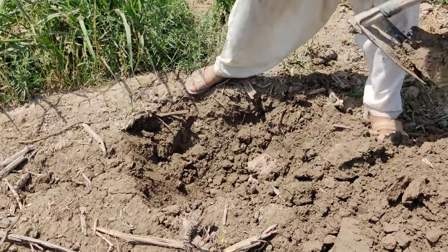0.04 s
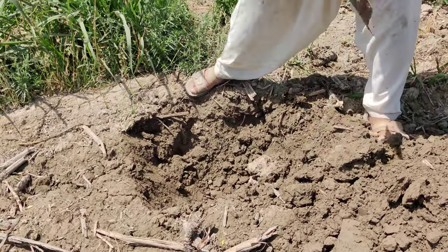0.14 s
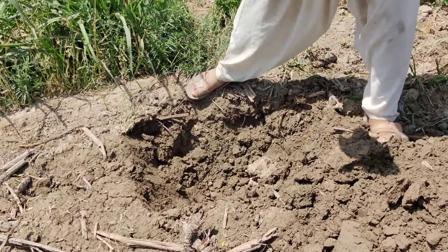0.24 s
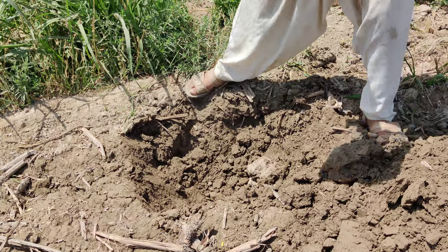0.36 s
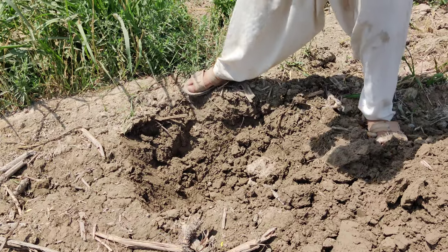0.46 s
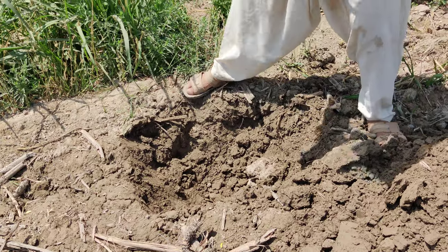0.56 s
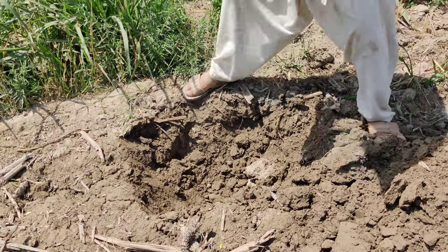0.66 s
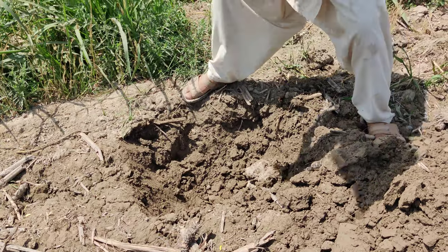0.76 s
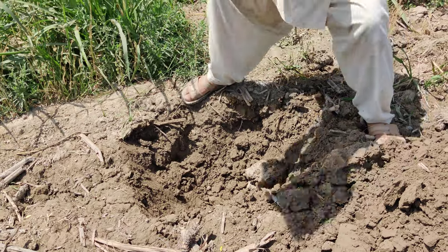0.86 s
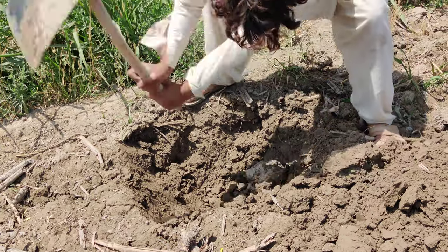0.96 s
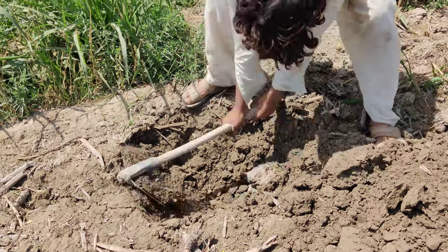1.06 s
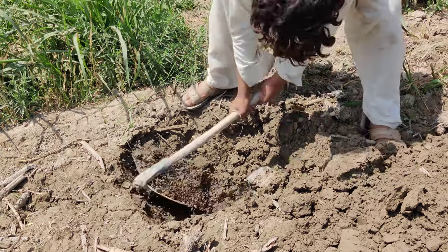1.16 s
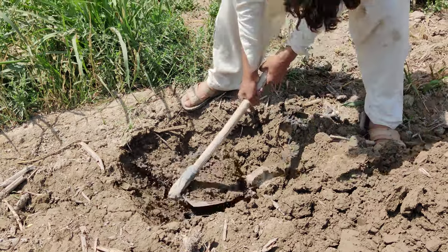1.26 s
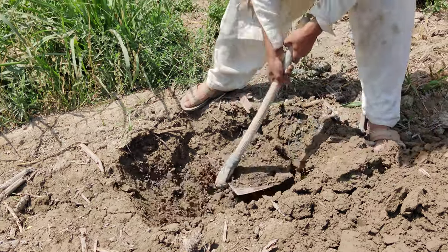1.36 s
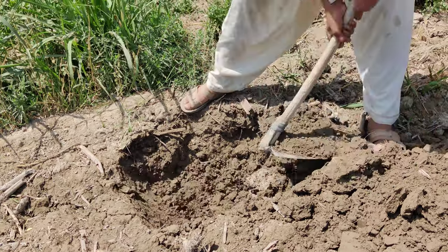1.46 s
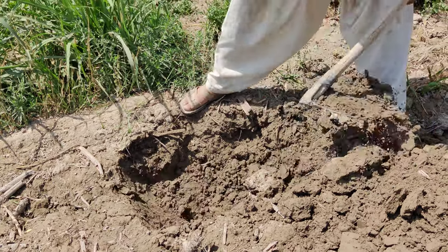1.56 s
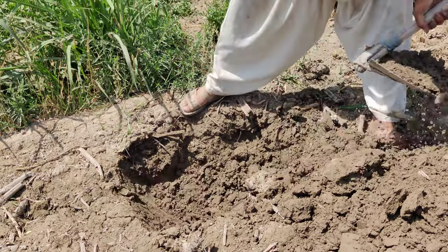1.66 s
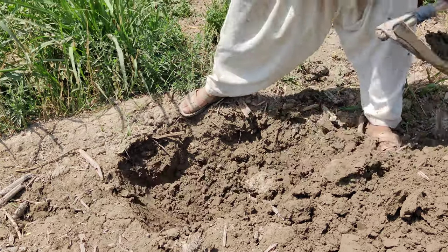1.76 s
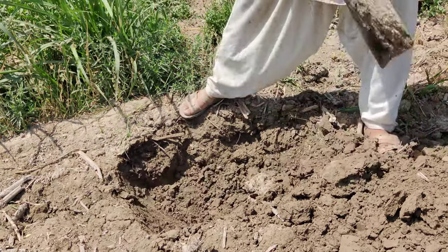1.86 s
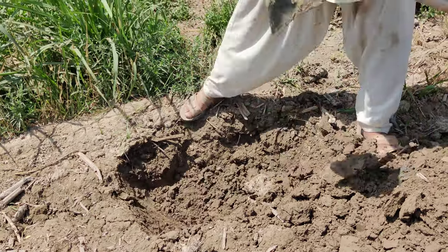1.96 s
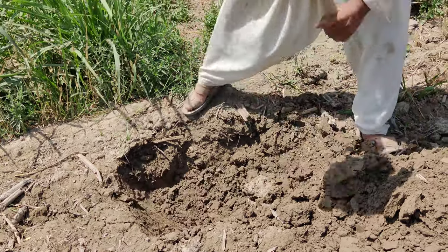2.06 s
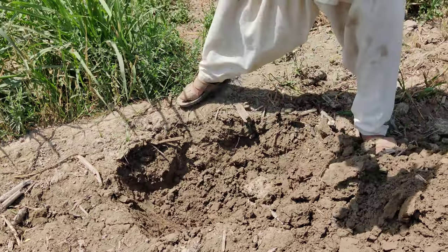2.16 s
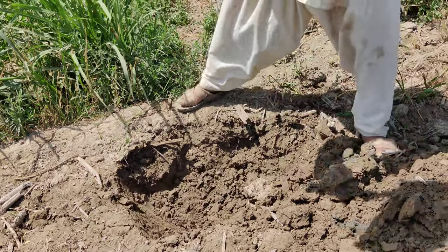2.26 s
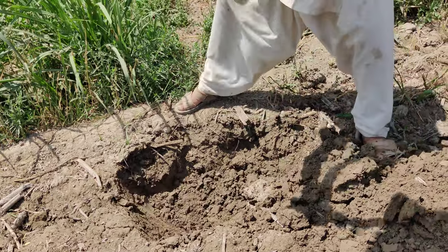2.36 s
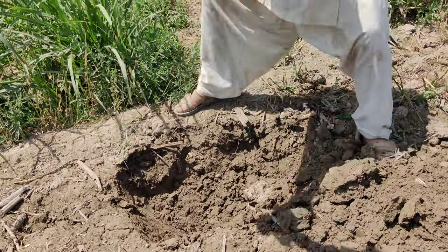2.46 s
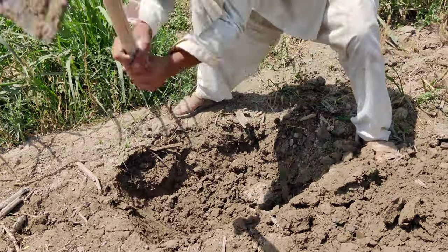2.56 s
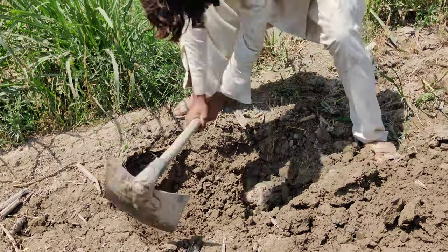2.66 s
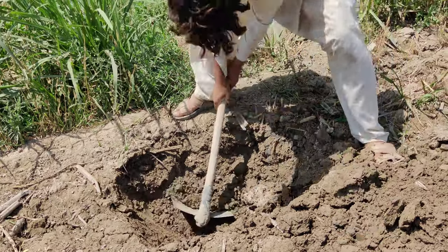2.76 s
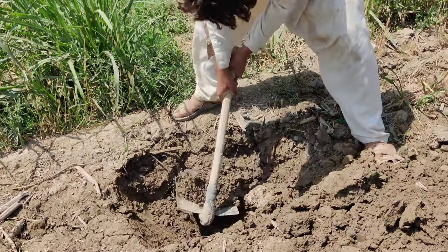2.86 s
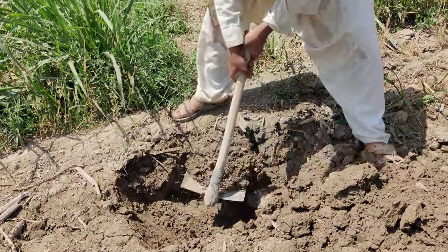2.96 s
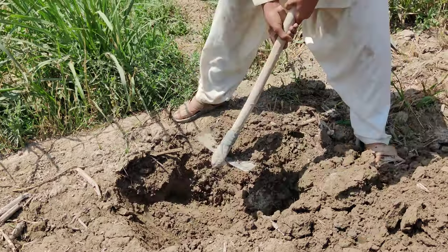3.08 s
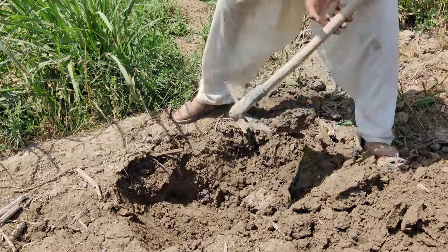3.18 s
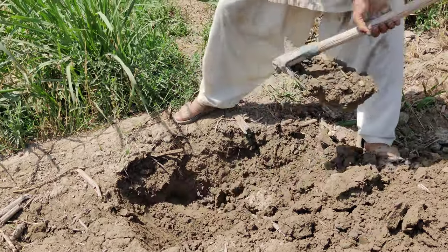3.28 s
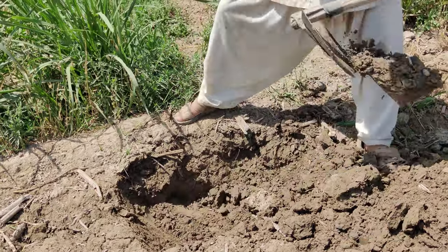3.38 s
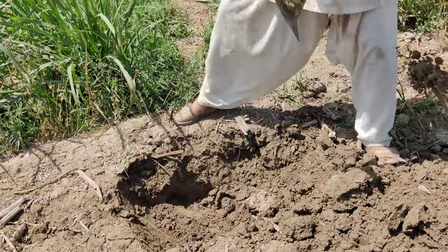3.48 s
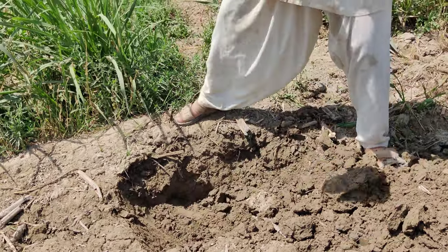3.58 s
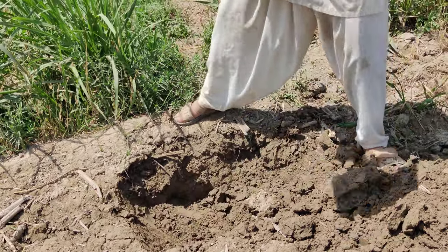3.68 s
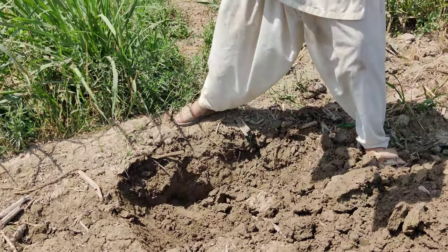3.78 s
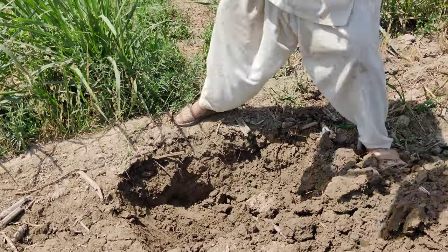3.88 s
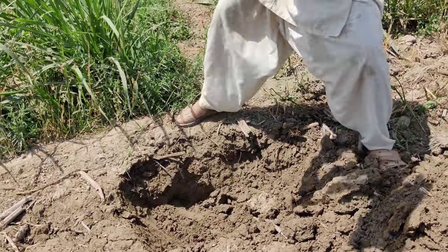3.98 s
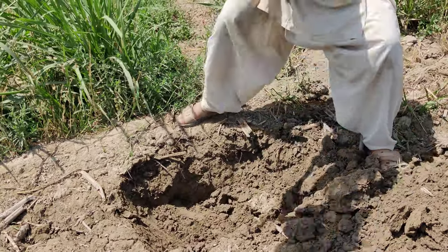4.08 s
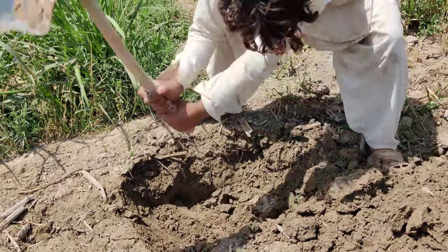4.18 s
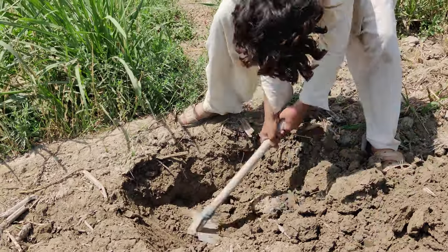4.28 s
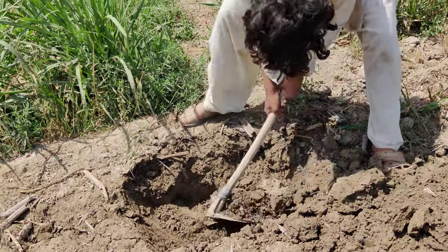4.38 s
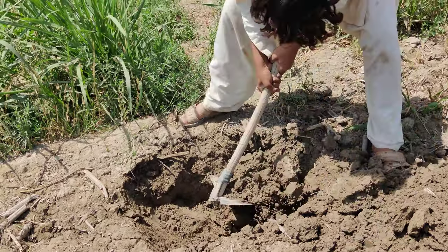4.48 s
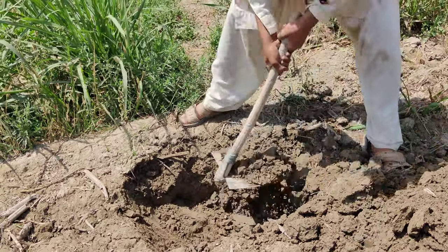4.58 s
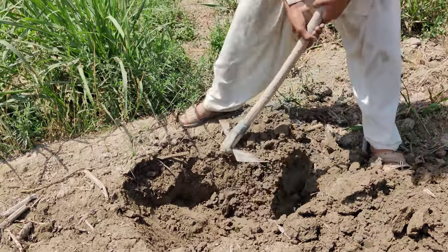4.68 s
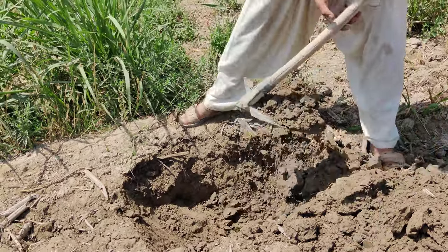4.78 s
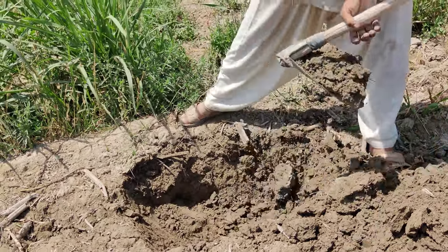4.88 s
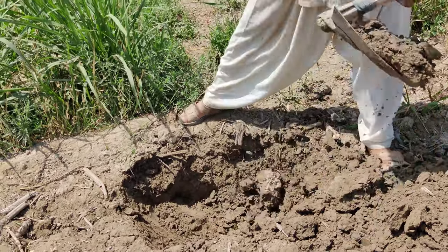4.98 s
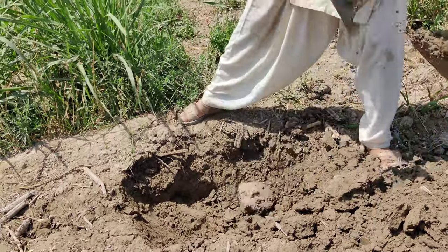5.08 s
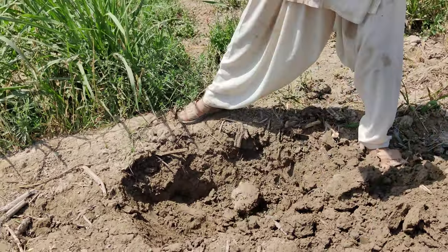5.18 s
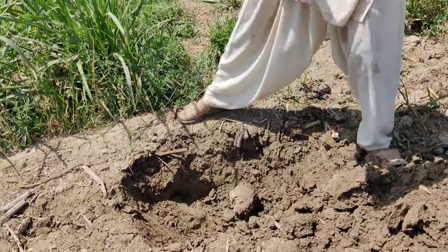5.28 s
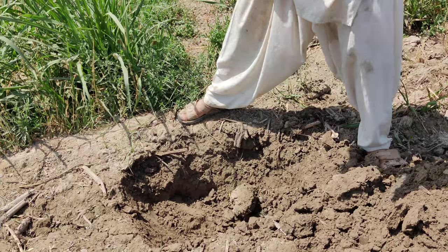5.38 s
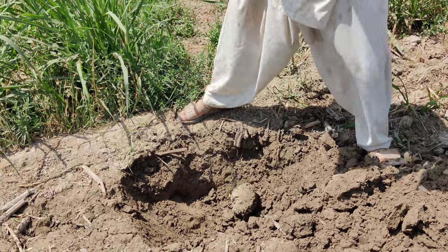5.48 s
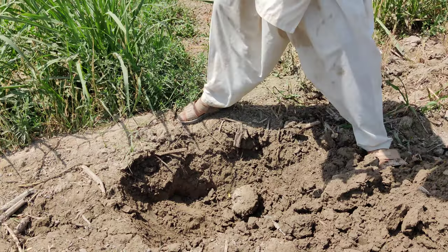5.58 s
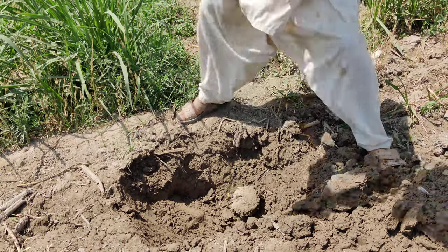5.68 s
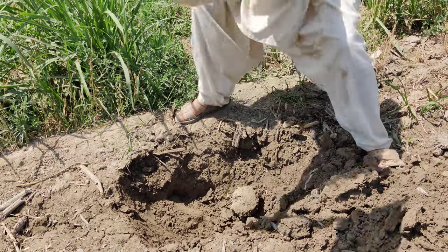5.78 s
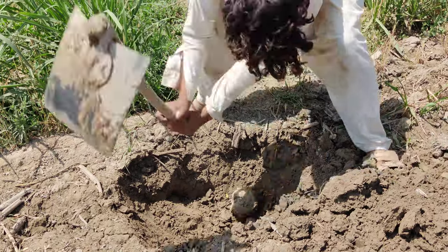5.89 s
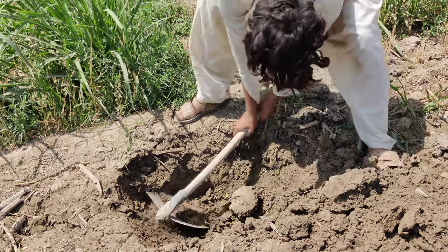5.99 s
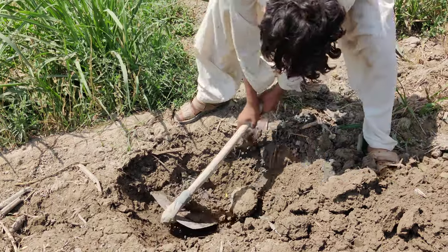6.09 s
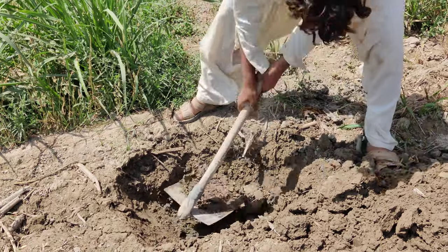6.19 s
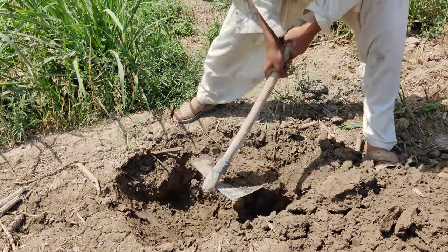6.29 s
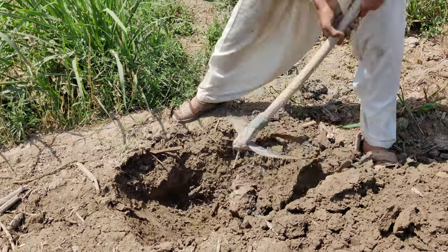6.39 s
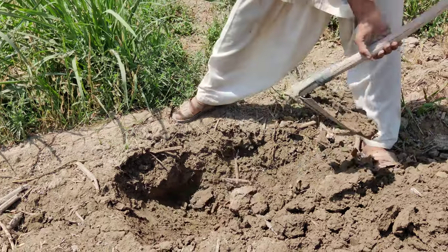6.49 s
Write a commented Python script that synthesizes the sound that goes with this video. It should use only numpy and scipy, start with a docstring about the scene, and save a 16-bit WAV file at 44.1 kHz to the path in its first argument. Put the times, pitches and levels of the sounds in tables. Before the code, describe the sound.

An open field heard close up in stereo, with steady soft air hiss and low, uneven wind rumble. Soil slides off a blade at the very start and a grainy shower lands around 0.6 s. A hoe chops dry, hard earth at 1.1 s with a gritty crunch and low thud, and a clod knocks at 1.55 s. Earth slides at 1.75 s and a thicker shower falls from 2.1 to 2.4 s. The second chop, at 2.8 s, is harder and knockier; soil slides softly at 3.3 s and drops briefly at 3.75 to 3.9 s. A third chop thuds at 4.4 s, earth slides at 5.0 s, and clods tumble with a shower around 5.4 s. The fourth, sharp chop comes at 6.05 s, with a last slide at 6.5 s. Roughly every second a bird on the right gives a short rising whistle with a quick echo; fainter chirps dot the distance.

```python
"""A field of dry, hard soil, heard at two microphone ports: a hand hoe chops it, each chop in a few jolts.
Each jolt gates noise for grit and crunch and strikes damped sines for hoe and thud; clods tick with short rings.
Loose earth slides and showers as grainy noise in three sizes. A bird's gliding sine repeats a rising whistle
that echoes once, others chirp far off; wind noise rumbles low under a steady hiss of open air."""
import sys
import numpy as np
from scipy import signal
from scipy.fft import rfft, irfft, next_fast_len
from scipy.io import wavfile
from scipy.ndimage import uniform_filter1d, map_coordinates

SR = 44100
rng = np.random.default_rng(int(sys.argv[2]) if len(sys.argv) > 2 else 0)


def wav_out(sig):
    """Save sig, one row per channel (or a flat mono array), as 16-bit PCM at SR to the path in sys.argv[1]."""
    wavfile.write(sys.argv[1], SR, np.round(np.clip(np.atleast_2d(sig).T, -1, 1) * 32767).astype(np.int16))


N = 288414

# crushed soil grit, relative spectrum: f/Hz, density/dB
GRIT_SPECTRUM = [(530, -20), (900, -3.5), (1520, -11.5), (1780, -9), (2030, -17), (2350, -7.5), (3720, -13),
                 (4520, -12.5), (5290, -16.5), (5980, -11.5), (7170, -30), (10400, -35), (13800, -37),
                 (15600, -49.5), (16400, -60)]
# chops: t/s, grit t60/s, finest grit spat by the dry crust/dB, dull crunch/dB (both relative),
# thud f/Hz, thud pitch sag as the blade sinks in/(1/s), negative rises
CHOP_ROWS = [(1.118, 0.036, 5.5, 8, 110, -8.5), (2.81, 0.025, -3, -9.5, 128, 14),
             (4.372, 0.027, -2, 4.5, 147, 11), (6.057, 0.03, -0.5, -1, 203, 22.5)]


def amp(db):
    """dB to gain."""
    return 10 ** (np.asarray(db) / 20)


def unit(x):
    """Scales to rms 1."""
    return x / np.sqrt(np.mean(x ** 2) + 1e-20)


def along(points, hz):
    """Interpolates (f/Hz, value) points on a log frequency axis."""
    f, v = np.transpose(points)
    return np.interp(np.log(hz + 1), np.log(f + 1), v)


def curves(rows):
    """One value per sample for each column after the time."""
    s, *cols = np.transpose(rows)
    return [np.interp(np.arange(N) / SR, s, c) for c in cols]


def wobble(rate_hz):
    """Smooth random curve with rate_hz knots a second."""
    knots = rng.standard_normal(int(N * rate_hz / SR) + 4)
    return map_coordinates(knots, [np.arange(N) * rate_hz / SR])


def swell(times_s, dbs):
    """Gain through (t/s, level/dB) corners; the first and last slopes run on one step, then near silence."""
    outer = lambda v: [2 * v[0] - v[1], *v, 2 * v[-1] - v[-2]]
    return amp(np.interp(np.arange(N) / SR, outer(times_s), outer(dbs), left=-150, right=-150))


def filtered(x, response):
    """Applies a complex frequency response by FFT, zero-padded."""
    m = next_fast_len(N + SR // 4)
    return irfft(rfft(x, m) * response(np.fft.rfftfreq(m, 1 / SR)), m)[..., :N]


def add(track, s, sound):
    """Mixes a short sound into the track at time s."""
    part = track[..., round(s * SR):][..., :sound.shape[-1]]
    part += sound[..., :part.shape[-1]]


def placed(x, lead_ms, pan_db):
    """Stereo placement: the left port hears x lead_ms earlier and pan_db louder than the right."""
    half = np.array([[.5], [-.5]])
    return filtered(x * amp(half * pan_db), lambda hz: np.exp(2j * np.pi * hz * half * lead_ms / 1000))


def rush(spectrum, alike, grain_db=0, grain_rate_hz=400):
    """Stereo noise of rms 1, shaped in spectrum and left-right likeness; both ports share its quick grains."""
    pair = rng.standard_normal((2, N)) * amp(grain_db * wobble(grain_rate_hz))
    # cos(2 * turn) is the left-right correlation
    turn = lambda hz: np.arccos(np.clip(along(alike, hz), -1, 1)) / 2
    split = lambda hz: amp(along(spectrum, hz)) * [np.cos(turn(hz)), np.sin(turn(hz))]
    mid, side = filtered(pair, split)
    return unit(np.array([mid + side, mid - side]))


def patchy(x, depth_db):
    """Random gain in patches of pitch and time, alike at both ports; rms 1."""
    z = signal.stft(x, nperseg=256)[2]
    patches = uniform_filter1d(rng.standard_normal(z.shape[1:]), size=4, axis=0)
    patches = uniform_filter1d(patches, size=9, axis=1)
    return unit(signal.istft(z * amp(depth_db * unit(patches)), nperseg=256)[1][:, :N])


def ring(hz, t60_s, rise_s, t):
    """Damped sine with a soft start."""
    return np.sin(2 * np.pi * hz * t) * amp(-60 * t / t60_s) * (1 - np.exp(-t / rise_s))


def field():
    """Wind buffets the ports as slow noise, a low rumble swells beside it, the open air hisses evenly."""
    # wind course: t/s, buffet/dB, rumble/dB (relative)
    wind_course = [(0.0, -48, -59.5), (0.62, -45, -58), (0.91, -48, -57), (1.13, -42, -52.5),
                   (1.53, -50.5, -57.5), (1.93, -54, -57.5), (2.13, -53, -57.5), (2.29, -46.5, -55),
                   (2.44, -46.5, -57.5), (2.64, -48, -57), (2.79, -48, -53), (2.99, -44.5, -54.5),
                   (3.35, -49.5, -57.5), (3.64, -51, -55.5), (4.08, -48, -57.5), (4.35, -47, -53),
                   (4.9, -52, -58), (5.21, -56.5, -58), (5.43, -52.5, -56), (5.57, -52, -58),
                   (5.7, -50, -55.5), (5.85, -48, -61), (6.05, -44.5, -57), (6.54, -47, -55.5)]
    # relative spectra: f/Hz, density/dB
    buffet_spectrum = [(7.1, -38), (12, -12.5), (21, 4.5), (38, -6.5), (46, -4.5), (60, -11), (70, -13.5),
                       (91, -34), (150, -120)]
    rumble_spectrum = [(26, -61), (45, -3), (81, -10.5), (103, -7.5), (134, -15), (165, -17), (221, -33.5),
                       (450, -34.5), (580, -59), (990, -120)]
    air_spectrum = [(120, -28), (200, 0), (305, -11.5), (579, -13.5), (659, -10.5), (1060, -12),
                    (1620, -18), (1980, -14), (2210, -17.5), (6050, -18.5), (8120, -29.5), (9400, -27),
                    (14300, -27.5), (15100, -31), (16000, -59)]
    # left-right likeness: f/Hz, correlation
    likeness = [(60, 1), (150, 0.92), (380, 0.8), (950, 0.18), (2380, 0.32), (5980, -0.02), (15000, 0.033)]
    buffet_db, rumble_db = curves(wind_course)
    buffet = amp(buffet_db + 4 + 3.4 * wobble(7.9)) * rush(buffet_spectrum, [(30, 0.86)])
    rumble = amp(rumble_db + 4.0 + 1.5 * wobble(9.9)) * rush(rumble_spectrum, likeness)
    air = amp(-64 + 0.07 * wobble(2.22)) * rush(air_spectrum, likeness)
    return placed(buffet + rumble, lead_ms=0.009, pan_db=3.0) + placed(air, lead_ms=.01, pan_db=0.2)


def whistle(note, factor, stretch=1):
    """One gliding sine from (t/s, f/Hz, level/dB) points, with a slightly unsteady level."""
    s, hz, db = np.transpose(note) * [[stretch], [factor], [1]]
    t = np.arange(s[0], s[-1], 1 / SR)
    smooth = lambda v: uniform_filter1d(np.interp(t, s, v), size=200, mode="nearest")
    edges = np.clip(np.minimum(t - s[0], s[-1] - t) / 0.0037, 0, 1)
    flutter = unit(uniform_filter1d(rng.standard_normal(len(t)), size=150))
    return edges * amp(smooth(db) + 2.9 * flutter) * np.sin(2 * np.pi * np.cumsum(smooth(hz)) / SR)


def birds():
    """The near bird sits to the right and echoes once; the crop scatters every note into a decaying haze."""
    # near calls: t of the whistle's zero time/s, level/dB (relative), time stretch, pitch factor,
    # lead-in t/s, lead-in level/dB (relative), echo level/dB (relative)
    near_calls = [(.747, -57, 1.08, 1.01, .6, -76, -2), (1.647, -59, 1.03, 1.0, 1.508, -69, 1),
                  (2.794, -58, 1.05, 1.0, 2.655, -62, -1), (3.633, -58, 1.0, 1.01, 3.49, -63, -1),
                  (4.611, -58, .94, 1.0, 4.478, -62, -1), (5.622, -58.5, 1.12, 1.0, 5.468, -66, 2)]
    # whistle before stretch and pitch factor: t from its zero time/s, f/Hz, level/dB
    whistle_points = [(-.092, 3250, -12), (-.066, 3800, -2), (-.05, 3990, 0), (-.028, 4300, 0),
                      (-.012, 4720, -1), (0, 5200, -6), (.007, 5380, -12), (.02, 5420, -24)]
    # short note ahead of it, before pitch factor: t from its start/s, f/Hz, level/dB
    lead_in_points = [(0, 3690, -6), (.008, 4110, -10), (.019, 4630, -4), (.04, 4430, -19),
                      (.045, 4370, -20.5)]
    # far chirps: t/s, length/s, first f/Hz, last f/Hz (before pitch factor), level/dB (relative)
    far_chirps = [(.01, 0.012, 2460, 2120, -63.5), (0.101, 0.017, 2520, 2180, -66),
                  (0.16, 0.043, 1995, 1690, -67), (0.288, 0.04, 3021, 2000, -68.5),
                  (0.941, 0.029, 1404, 1145, -69), (1.009, 0.03, 2820, 2060, -70),
                  (1.027, .016, 3720, 3350, -74), (2.128, 0.024, 2110, 1910, -59.5),
                  (4.458, 0.018, 2150, 1930, -63), (4.475, 0.02, 1970, 2010, -72.5),
                  (4.628, 0.025, 2025, 1910, -68)]
    echo_delay_s, far_pitch_factor = .0437, 0.98
    near, echo, far = np.zeros(N), np.zeros(N), np.zeros(N)
    for s, db, stretch, factor, lead_s, lead_db, echo_db in near_calls:
        main_start_s = s + stretch * whistle_points[0][0]
        main_note = amp(db + 6.0) * whistle(whistle_points, factor, stretch)
        lead_note = amp(lead_db + 11.0) * whistle(lead_in_points, factor)
        for start_s, sound, returns_db in [(main_start_s, main_note, 0), (lead_s, lead_note, -5)]:
            add(near, start_s, sound)
            add(echo, start_s + echo_delay_s, amp(echo_db + returns_db) * sound)
    for s, length_s, first_hz, last_hz, db in far_chirps:
        chirp = whistle([(0, first_hz, 0), (length_s, last_hz, 0)], far_pitch_factor)
        add(far, s, amp(db + 3.5) * chirp)
    # the echo returns the high end of the glide best
    echo_response = [(3500, -17), (4200, -8), (4600, -4), (5200, 4), (5500, -1)]
    echo = filtered(echo, lambda hz: amp(along(echo_response, hz)))
    direct = placed(near, lead_ms=-0.17, pan_db=-6.5) + placed(far, lead_ms=.02, pan_db=-5.0) + echo
    t = np.arange(SR // 4) / SR
    tail = rng.standard_normal((2, len(t))) * amp(-60 * t / 0.38)
    tail /= np.linalg.norm(tail[0])
    haze = signal.fftconvolve((near + echo + far)[None], tail, axes=1)[:, :N]
    return direct + amp(-7) * haze


def earth_levels():
    """Relative gains of hiss, dust and crumbs: the powers of all moving earth add up."""
    # thrown earth showers down, lumps at once, fines ever thicker:
    # t/s, length/s, growth/dB, hiss/dB, dust/dB, crumbs/dB, fall by 20 dB/s
    showers = [(0.556, .12, 11, -59.5, -55, -63, .07), (2.12, 0.27, 16.5, -58.5, -52.5, -59.5, 0.057),
               (3.749, .045, 8, -63.5, -60, -61, .09), (3.862, 0.067, 4.5, -64, -57.5, -61.5, 0.038),
               (5.399, 0.2, 10, -62.5, -58.5, -58.5, .15)]
    # earth slides off the lifted blade: t of top/s, rise by 20 dB/s, fall by 20 dB/s, hiss/dB, dust/dB, crumbs/dB
    slides = [(0.039, 0.093, 0.039, -64.5, -56.5, -59), (1.752, 0.086, 0.052, -65, -49, -61),
              (3.262, 0.15, 0.18, -72, -62, -71), (4.985, 0.07, 0.18, -68, -62.5, -60.5),
              (6.498, 0.054, .1, -68.5, -58.5, -68)]
    # steady rustles of blade, feet and cloth in loose soil: t/s, length/s, hiss/dB, dust/dB, crumbs/dB
    rustles = [(0.07, 0.54, -77, -74, -62.5), (0.796, 0.042, -81, -74, -70), (.94, 0.14, -79, -73, -66),
               (0.69, 0.039, -80, -80, -63), (1.22, .3, -78, -73, -65), (1.526, 0.15, -70.5, -69.5, -62.5),
               (1.798, 0.075, -74.5, -76, -68), (2.48, .13, -76.5, -70, -69),
               (2.639, 0.041, -66, -65.5, -56), (2.765, 0.054, -78, -75, -61), (2.95, 0.27, -74, -72, -63),
               (3.34, 0.17, -73, -75, -79), (3.63, 0.21, -73.5, -77, -62), (3.949, 0.302, -76, -73, -62),
               (4.355, 0.032, -69.5, -61, -62), (4.597, 0.23, -73.5, -72, -65.5),
               (4.826, 0.03, -77, -66, -67), (5.674, 0.343, -73, -73.5, -58),
               (6.21, 0.28, -76.5, -72.5, -63)]
    shower_onset_s, rustle_edge_s = 0.034, 0.06
    # earth trickles back after each chop: hiss, dust, crumbs
    settle_db, settle_end_s = [-64.5, -62.5, -51], 0.12
    power = np.zeros((3, N))
    for s, length_s, growth_db, *dbs, fall_s in showers:
        end_s = s + length_s
        times_s = [s - shower_onset_s, s, end_s, end_s + fall_s]
        fines = swell(times_s, [-20 - growth_db, -growth_db, 0, -20])
        lumps = swell(times_s, [-20, 0, 0, -20])
        power += (amp(dbs)[:, None] * [fines, fines, lumps]) ** 2
    for s, rise_s, fall_s, *dbs in slides:
        power += np.outer(amp(dbs), swell([s - rise_s, s, s + fall_s], [-20, 0, -20])) ** 2
    for s, length_s, *dbs in rustles:
        end_s = s + length_s
        times_s = [s - rustle_edge_s, s, end_s, end_s + rustle_edge_s]
        power += np.outer(amp(dbs), swell(times_s, [-21, -1.5, -1.5, -13])) ** 2
    for s, *_ in CHOP_ROWS:
        trickle = swell([s + .01, s + 0.025, s + settle_end_s], [-20, 0, -20])
        power += np.outer(amp(settle_db), trickle) ** 2
    return np.sqrt(power)


def narrow_hisses():
    """Brief swells of noise in a narrow band within the rustle."""
    # t of top/s, rise by 20 dB/s, fall by 20 dB/s, centre f/Hz, centre to -40/3 dB on either side/Hz, level/dB
    bands = [(.46, .4, .2, 1275, 90, -66), (.658, 0.048, .04, 2650, 180, -51),
             (3.17, .12, .06, 3380, 200, -62), (3.25, 0.088, .06, 5900, 350, -63),
             (4.95, .03, 0.099, 6150, 250, -55.5), (5.77, .04, 0.074, 3920, 91, -59),
             (6.502, .08, .08, 6300, 300, -64)]
    total = np.zeros((2, N))
    for s, rise_s, fall_s, hz, width_hz, db in bands:
        spectrum = [(hz - 3 * width_hz, -40), (hz, 0), (hz + 3 * width_hz, -40)]
        gain = amp(db) * swell([s - rise_s, s, s + fall_s], [-20, 0, -20])
        total += gain * rush(spectrum, [(hz, .5)])
    return total


def loose_earth():
    """Sliding and falling earth: dense noise grains in three sizes, clumped in time and pitch."""
    # relative spectra: f/Hz, density/dB
    hiss_spectrum = [(1060, -39), (1800, -8), (2030, -3.5), (2170, -7.5), (2690, -1.5), (3300, -3),
                     (3430, -1.5), (4520, -1), (6070, 0.5), (8300, -17.5), (10800, -43), (18300, -120)]
    dust_spectrum = [(4590, -5), (7800, -4.5), (9450, -3), (10300, -3), (12900, -2.5), (15500, -2),
                     (16000, -27)]
    crumb_spectrum = [(150, -11), (250, -3), (586, -7), (664, -5), (730, -5.5), (1690, -12.5), (3000, -16),
                      (3900, -17.5), (6600, -120)]
    hiss_gain, dust_gain, crumb_gain = earth_levels()
    clump_db = 1.75 * wobble(35)
    hiss = rush(hiss_spectrum, [(3000, 0.12)], grain_db=1.0, grain_rate_hz=220)
    hiss = hiss_gain * amp(9.0 + clump_db) * patchy(hiss, depth_db=1.0)
    dust = rush(dust_spectrum, [(9000, 0.086)], grain_db=1.0, grain_rate_hz=900)
    dust = dust_gain * amp(2.0 * wobble(49)) * patchy(dust, depth_db=3.0)
    crumbs = rush(crumb_spectrum, [(300, 0.95), (2500, 0.33)], grain_db=-0.5, grain_rate_hz=130)
    crumbs = crumb_gain * amp(clump_db) * patchy(crumbs, depth_db=3.0)
    return placed(hiss + dust + crumbs + narrow_hisses(), lead_ms=.12, pan_db=1.0)


def pebbles():
    """Small damped rings at random times, louder where crumbs roll."""
    draws, out, t = rng.random((90, 3)), np.zeros(N), np.arange(SR // 50) / SR
    crumb_gain = earth_levels()[2]
    for when, pitch, size in draws:
        s = when * (N - 1) / SR
        gain = crumb_gain[round(s * SR)] * amp(-5 - 16 * size)
        add(out, s, gain * ring(500 * 5 ** pitch, 0.0052, .0002, t))
    return out


def clods():
    """Clods and pebbles tick: a dull damped tap with a short dry crack of noise on top."""
    # t/s, tap/dB, crack/dB, crack brightness/dB (levels relative), tap f/Hz
    ticks = [(0.239, -54, -81, -5, 1140), (1.547, -57, -49.5, -2.5, 721), (1.557, -40.5, -46, -9, 300),
             (1.622, -63, -67, 11, 850), (2.322, -49.5, -63, -9, 1080), (2.916, -38.5, -44.5, -22, 676),
             (3.345, -57.5, -55.5, -13, 940), (3.643, -50, -61, -15, 738), (3.736, -52.5, -66, -8, 789),
             (3.91, -50, -39.5, -16, 775), (4.239, -70, -53, -17, 837), (4.939, -59, -59, -8, 501),
             (5.253, -58, -76, -6, 1170), (5.339, -57, -60, -19, 810), (5.36, -51, -64, -8, 450),
             (5.398, -52.5, -69, -5, 533), (5.454, -43.5, -66, -5, 600), (5.483, -43.5, -68, -4, 483),
             (5.709, -56, -53, -15, 725), (5.906, -54, -70, -8, 790), (6.101, -48, -46.5, -5.5, 820),
             (6.255, -56, -59, -9, 501)]
    body, coarse, fine, t = np.zeros(N), np.zeros(N), np.zeros(N), np.arange(SR // 20) / SR
    for s, db, crack_db, bright_db, hz in ticks:
        tap = ring(hz, 0.011, 0.00025, t)
        tap += 0.2 * ring(2.0 * hz, 0.0036, .0001, t)
        tap += 0.45 * ring(0.364 * hz, 0.026, 0.0014, t)
        add(body, s, amp(db + 7.5) * tap)
        add(coarse, s, amp(crack_db - 0.5 - 60 * t / 0.042))
        add(fine, s, amp(crack_db + bright_db + 4 - 60 * t / 0.013))
    crack = coarse * rush(GRIT_SPECTRUM[2:11], [(3000, 0.44)])
    crack += fine * rush([(5000, -41)] + GRIT_SPECTRUM[10:], [(9000, 0.35)])
    return placed(body + pebbles() + crack, lead_ms=0.12, pan_db=0.5)


def chops():
    """Each jolt crushes grit, rings the soil-damped blade and handle, and thuds into the ground."""
    # jolts: t/s, coarse grit/dB, fine grit/dB, knock/dB, hardness/octaves over the lowest mode, thud/dB
    # (levels relative)
    jolts = [(1.1191, -32, -26, -35, 0.94, -50), (1.1217, -34, -22.5, -29.5, 0.8, -19.5),
             (1.128, -26.5, -39, -34, 0.15, -26), (1.1331, -29, -30.5, -25, 0.77, -17),
             (2.8081, -35, -28.5, -24, 3.1, -38), (2.8106, -23, -23, -14.5, .02, -47),
             (2.8144, -26.5, -33, -17.5, 2.37, -23.5), (2.834, -53, -50, -27, 0.71, -26),
             (4.372, -23.5, -34, -26.5, 0.26, -22.5), (4.376, -26, -24.5, -17.5, 0.8, -15),
             (4.383, -38, -39, -10, 1.16, -22), (4.386, -29, -55, -38, 0.38, -14.5),
             (4.399, -50, -57, -37, 0.47, -19), (6.057, -29, -39, -39, 0.72, -28),
             (6.06, -19.5, -19, -9.5, 0.21, -47), (6.066, -35, -43, -15.5, 0.075, -21.5),
             (6.0735, -23, -39, -17.5, 1, -31), (6.078, -46, -45, -27, 0.38, -18.5)]
    # modes of blade and handle: f/Hz, level/dB (relative), t60/s
    hoe_modes = [(439, -1, 0.03), (555, -1.5, 0.022), (708, -2, 0.032), (800, -10.5, 0.039),
                 (970, -1.5, 0.015), (1273, -5, 0.019), (1800, -7, 0.019), (2270, -9, 0.017),
                 (2614, -17.5, 0.026)]
    fine_t60_share = 0.93  # of the coarse grit t60
    coarse, fine, finest, knock, blows = np.zeros((5, N))
    t = np.arange(SR // 4) / SR
    mode_draws = rng.standard_normal((len(jolts), len(hoe_modes)))
    for (s, coarse_db, fine_db, knock_db, hardness, thud_db), draws in zip(jolts, mode_draws):
        nearest = min(CHOP_ROWS, key=lambda row: abs(row[0] - s))
        start_s, grit_t60_s, dry_db, dull_db, thud_hz, sag = nearest

        def fall(t60_s):
            """Grit dies fast, then a few crumbs trickle on."""
            return (amp(-60 * t / t60_s) + amp(-30.5 - 60 * t / 0.095)) * (1 - np.exp(-t / 0.00065))

        fine_fall = fall(fine_t60_share * grit_t60_s)
        add(coarse, s, amp(coarse_db) * fall(grit_t60_s))
        add(fine, s, amp(fine_db - 6.0) * fine_fall)
        add(finest, s, amp(fine_db + dry_db - 11.0) * fine_fall)
        add(knock, s, amp(knock_db + dull_db - 9.0 - 60 * t / 0.058) * (1 - np.exp(-t / 0.0014)))
        # a harder contact favours the higher modes
        for (hz, db, t60_s), draw in zip(hoe_modes, draws):
            favour_db = -9 * abs(np.log2(hz / hoe_modes[0][0]) - hardness)
            mode_db = knock_db + 2.5 + db + favour_db + 1.5 * draw
            add(blows, s, amp(mode_db) * ring(hz, t60_s, 0.0012, t))
        jolt_thud_hz = thud_hz * np.exp(-sag * (s - start_s))
        add(blows, s, amp(thud_db + 4.5) * ring(jolt_thud_hz, 0.042, 0.00063, t))
    coarse_spectrum = GRIT_SPECTRUM[:9] + [(10000, -39)]
    fine_spectrum = [(3800, -25.0)] + GRIT_SPECTRUM[8:12] + [(11800, -58), (14500, -85)]
    finest_spectrum = [(8500, -33.5)] + GRIT_SPECTRUM[11:]
    grit = coarse * rush(coarse_spectrum, [(1000, 1.0), (3000, 0.75)], grain_db=2.0, grain_rate_hz=540)
    grit += fine * rush(fine_spectrum, [(6000, 0.07)], grain_db=2.0, grain_rate_hz=1600)
    grit += finest * rush(finest_spectrum, [(12000, 0.21)], grain_db=3.5, grain_rate_hz=1300)
    # the packed soil crunches dully under the edge
    crunch_spectrum = [(120, 15), (350, 11), (900, -7), (1600, -17.0), (3000, -71.0)]
    crunch = knock * rush(crunch_spectrum, [(500, 1.0)])
    return placed(grit + crunch + blows, lead_ms=0.11, pan_db=3.0)


def scene():
    """Sums all sources at the two ports."""
    return field() + birds() + loose_earth() + clods() + chops()


def record(dry):
    """Fades the last treble above 15.2 kHz and keeps nothing from 16.5 kHz up."""
    top_hz = 16500
    return filtered(dry, lambda hz: amp(along([(15200, -0.5), (15700, -24)], hz)) * (hz < top_hz))


dry = scene()
out = record(dry)
wav_out(out)
```